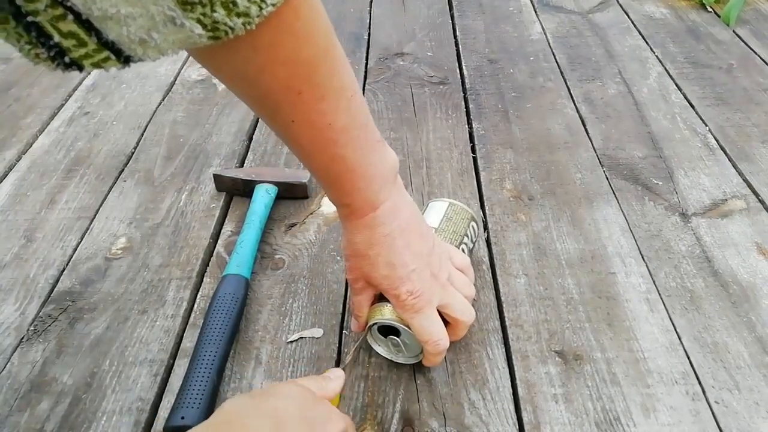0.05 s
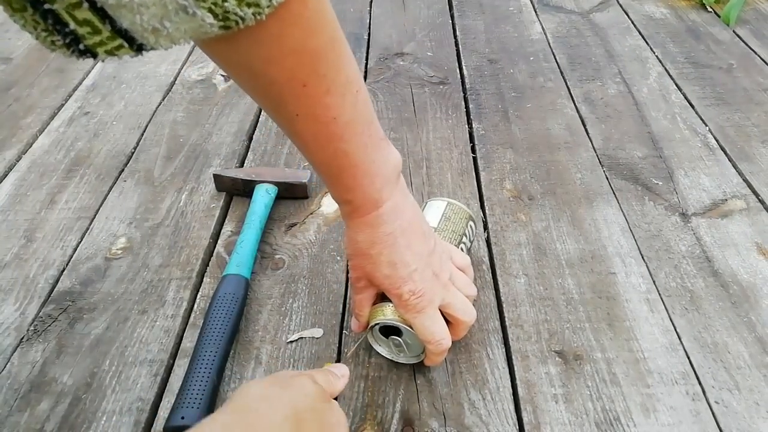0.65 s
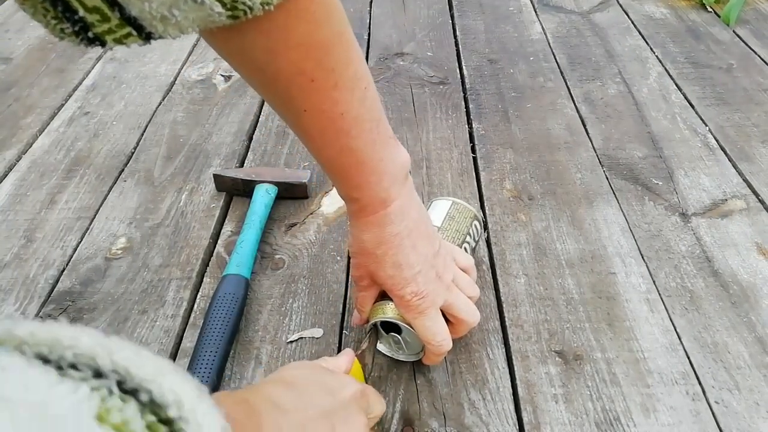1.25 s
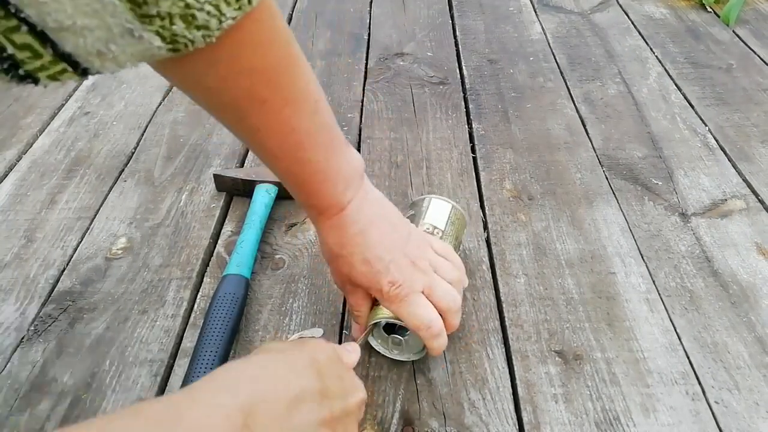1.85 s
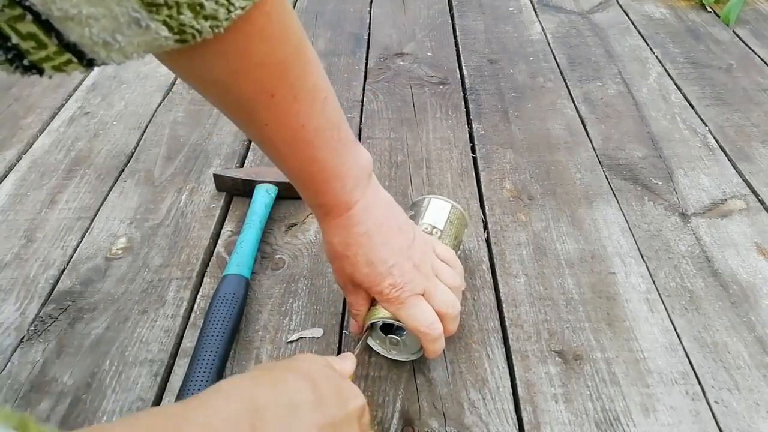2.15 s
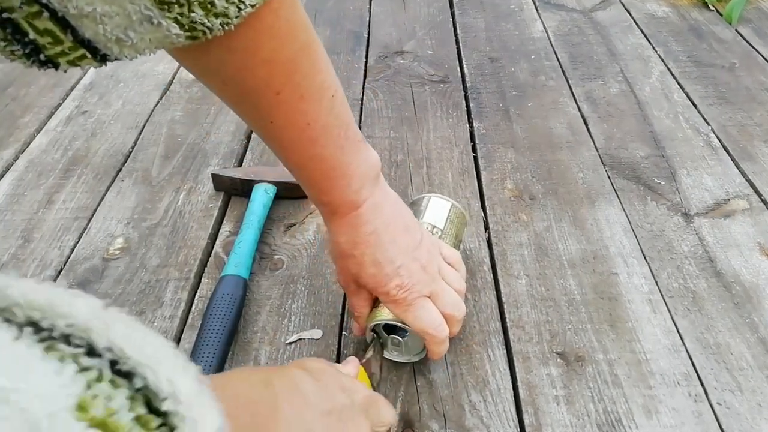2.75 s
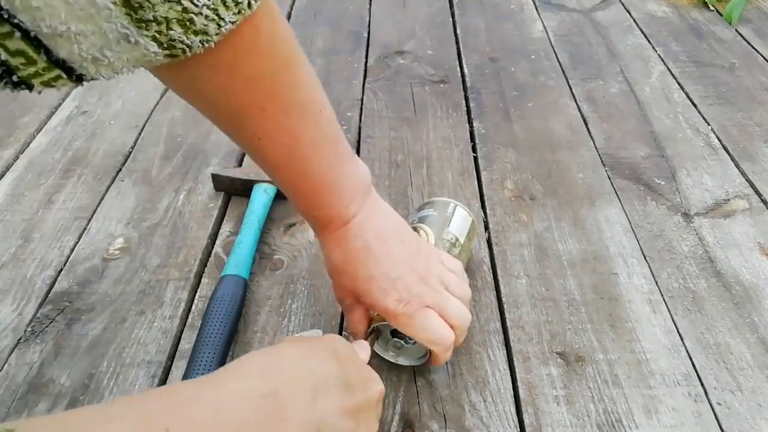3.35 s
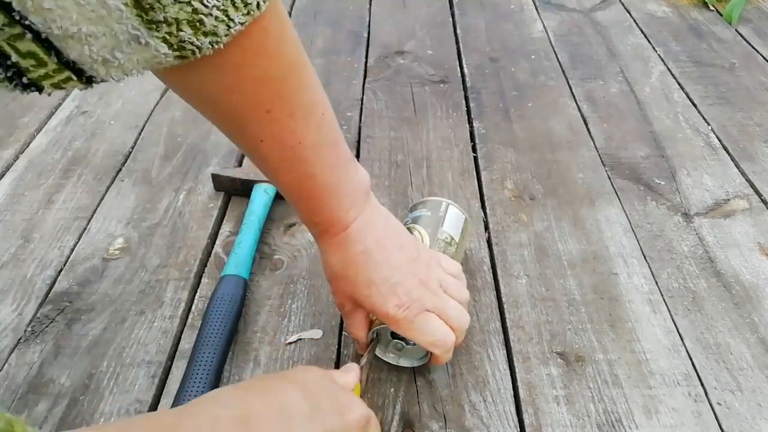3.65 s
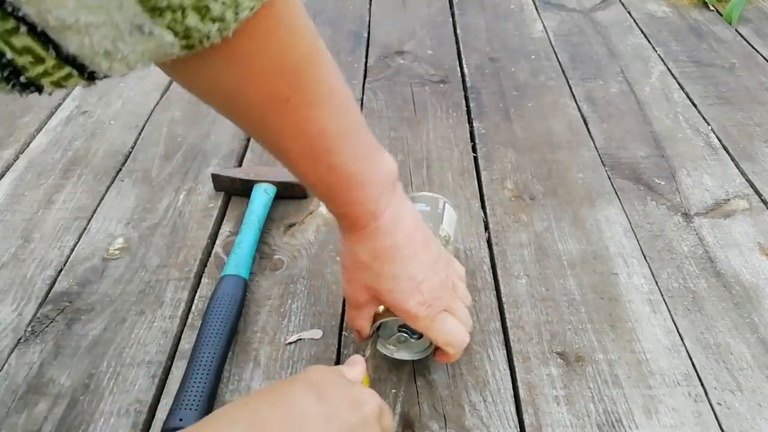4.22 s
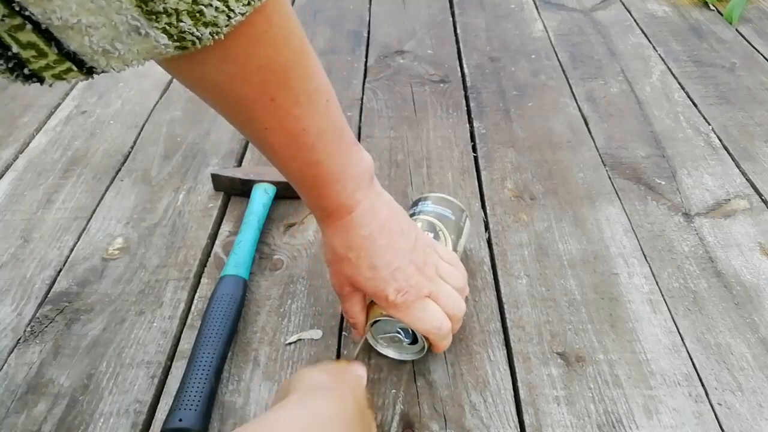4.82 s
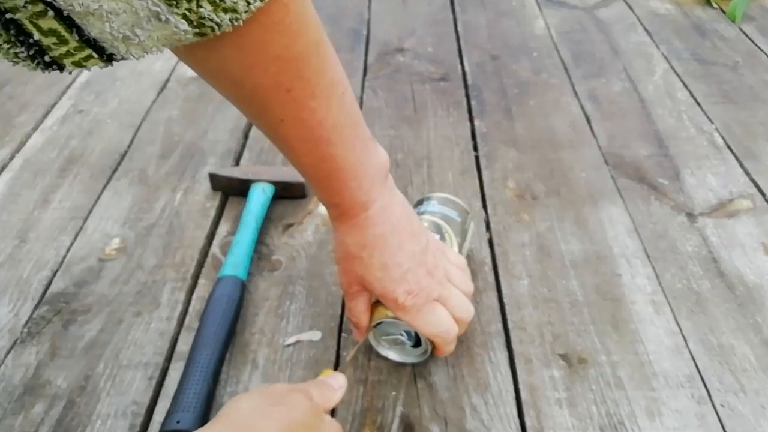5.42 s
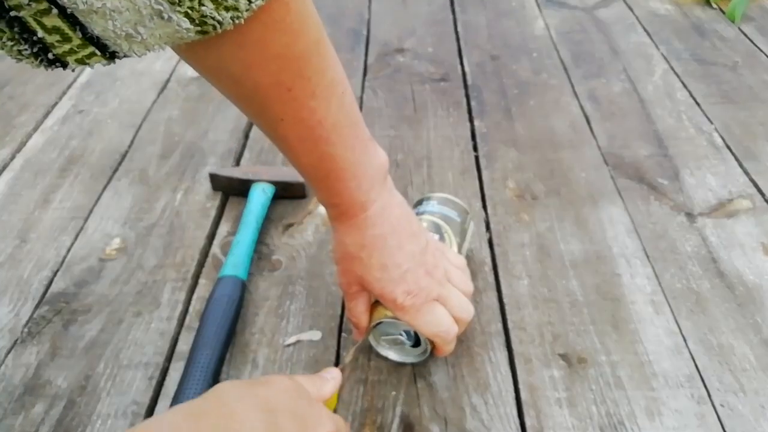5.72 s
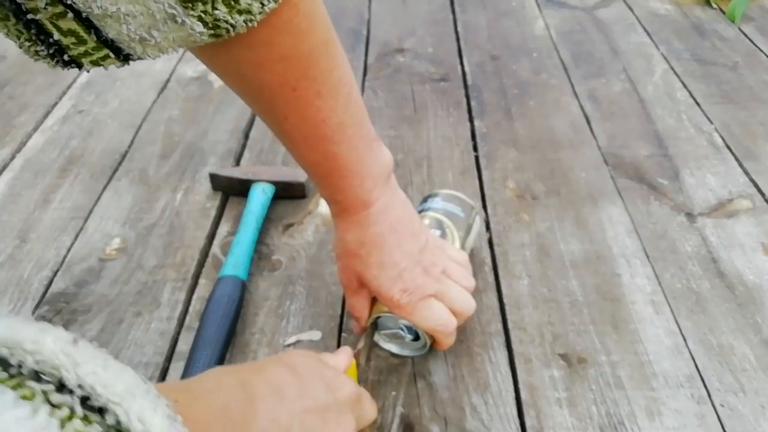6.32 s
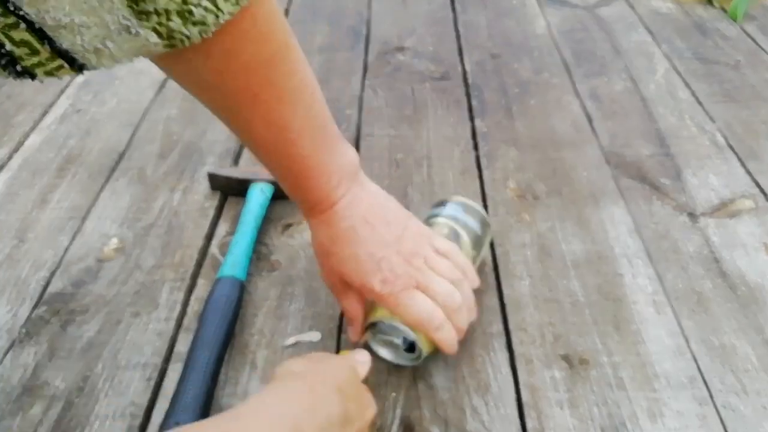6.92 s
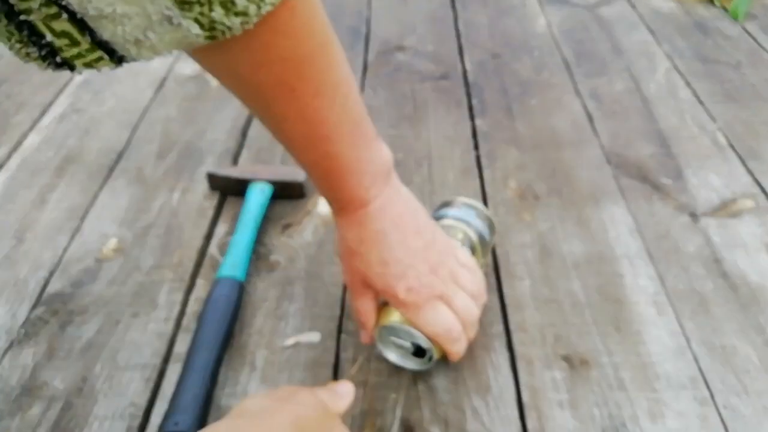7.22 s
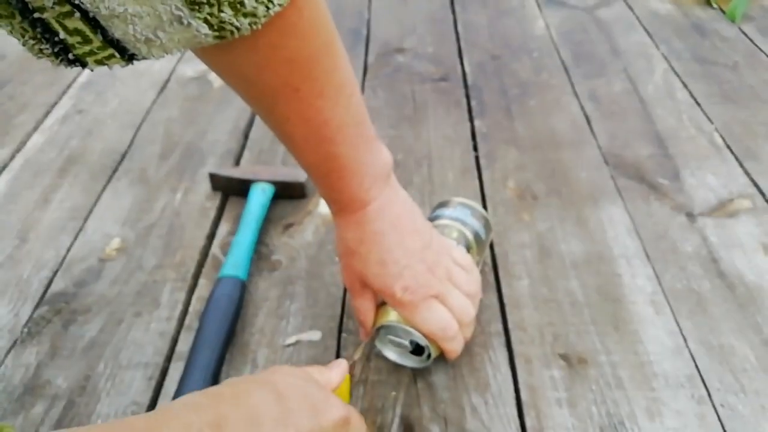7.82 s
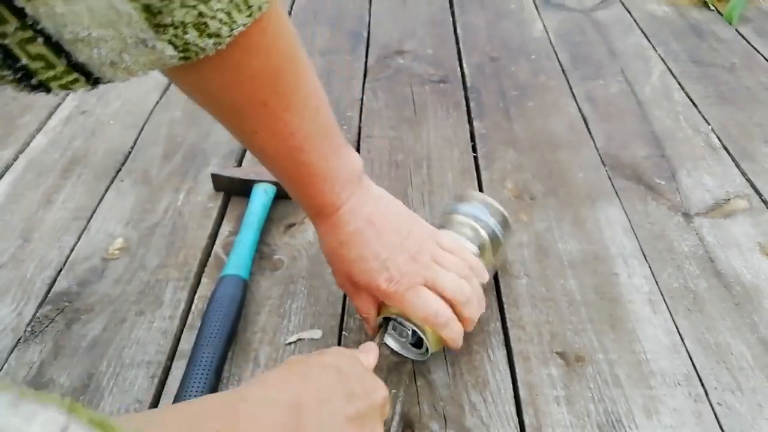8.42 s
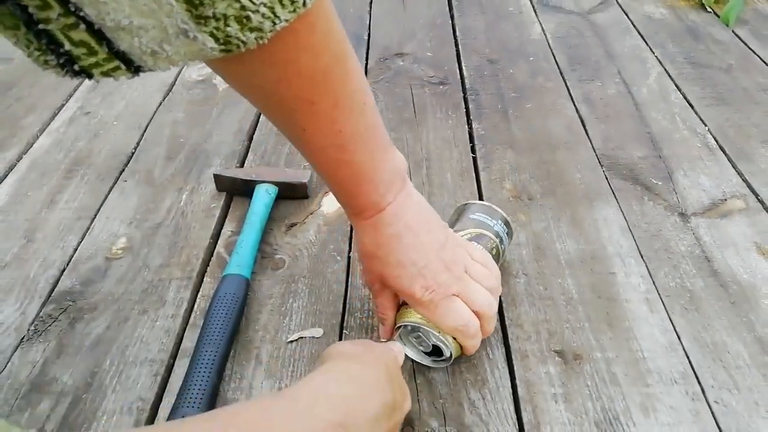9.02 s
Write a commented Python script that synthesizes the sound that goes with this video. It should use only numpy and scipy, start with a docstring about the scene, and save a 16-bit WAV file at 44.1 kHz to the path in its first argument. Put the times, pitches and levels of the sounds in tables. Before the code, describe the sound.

A small knife cuts around the rim of an empty aluminium can, close to the microphone, over very quiet outdoor air. A few light clicks come first, then a short tearing scrape just before 1 second. Sharp snaps and hollow knocks on wood follow from 1.2 to 1.8 seconds. The busiest stretch runs from about 2.3 to 4.3 seconds: crackling, buckling metal, with a loud, briefly ringing snap near 2.9 and dry rubbing as the can turns. Dull microphone thumps accompany snaps near 1.2, 3.6 and 6.1 seconds. From 4.4 to 5.7 seconds there are only softer rubs and ticks, with one very faint, distant falling bird whistle around 5.2. Crisp snaps return at 5.8 seconds and continue in uneven clusters, mixed with crinkles, small knocks and a scrape near 8.4, ending with a sharp click around 9 seconds.

```python
"""Outdoors on garden planks, a small knife works round the rim of an empty aluminium can held by hand.
The can rubs each time it is turned, its thin wall snaps and buckles, and the blade tears through in short
stick-slip bites. Snags and knocks sound the lid and the hollow inside, and the torn edge crinkles.
A few jolts overload the close microphone with a dull thump; a light breeze blows and a bird calls far off."""
import sys
import numpy as np
from scipy import signal
from scipy.fft import rfft, irfft, next_fast_len
from scipy.io import wavfile
from scipy.ndimage import map_coordinates

SR = 44100
rng = np.random.default_rng(int(sys.argv[2]) if len(sys.argv) > 2 else 0)


def wav_out(sig):
    """Save sig, one row per channel (or a flat mono array), as 16-bit PCM at SR to the path in sys.argv[1]."""
    wavfile.write(sys.argv[1], SR, np.round(np.clip(np.atleast_2d(sig).T, -1, 1) * 32767).astype(np.int16))


N = 399546


def amp(db):
    return 10 ** (np.asarray(db) / 20)


def unit_rms(x):
    return x / np.sqrt(np.mean(x ** 2) + 1e-20)


def along(points, hz):
    """Read a curve of (frequency, value) points on a log-frequency axis."""
    freqs, values = np.transpose(points)
    return np.interp(np.log(hz + 1), np.log(freqs), values)


def wobble(rate):
    """A smooth random curve, rate knots a second."""
    knots = rng.standard_normal(int(N * rate / SR) + 4)
    return map_coordinates(knots, [np.arange(N) * rate / SR])


def add(track, start, sound):
    """Mix a sound into the track, start seconds in."""
    part = track[:, round(start * SR):][:, :sound.shape[-1]]
    part += sound[..., :part.shape[-1]]


def colour(points, hz):
    """Minimum-phase EQ through (frequency, gain) points."""
    cepstrum = irfft(np.log(amp(along(points, hz))))
    half = len(cepstrum) // 2
    return np.exp(rfft(np.r_[cepstrum[0], 2 * cepstrum[1:half]], len(cepstrum)))


def resonance(hz, centre, width):
    """The band-pass response of one damped mode."""
    return 1j * hz * width / (centre ** 2 - hz ** 2 + 1j * hz * width)


def push(start, length, db, arch_db=9.5, stop_db_per_s=1201):
    """Envelope of one push of hand or wind: it speeds up and slows in an arch, then stops quickly."""
    from_middle = np.abs(np.arange(N) / SR - start - length / 2)
    arch = arch_db * np.minimum(2 * from_middle / length, 1) ** 2
    ends = stop_db_per_s * np.clip(from_middle - length / 2, 0, 1)
    return amp(db - arch - ends)


# Stereo lean of the two microphone ports: (frequency [Hz], left over right [dB])
PORT_BALANCE = [(350, 0.5), (700, 5), (1290, -2), (2380, 4.5), (8120, -4.5), (15000, 21.5)]
# How alike the ports sound: (frequency [Hz], correlation [0-1])
PORT_LIKENESS = [(200, 1), (5000, 0.42), (15000, 0.14)]
def radiate(force, response, lead_s=4e-5):
    """Two unrelated forces reach the ports through a response, at rms 1; the left port is nearer."""
    n = force.shape[-1]
    size = 2 * next_fast_len(n * 3 // 4)
    hz = np.fft.rfftfreq(size, 1 / SR)
    common, apart = rfft(force, size) * response(hz)
    spread = np.arccos(np.clip(along(PORT_LIKENESS, hz), 0, 1)) / 2
    mid, side = common * np.cos(spread), apart * np.sin(spread)
    lean = amp(along(PORT_BALANCE, hz))
    left = (mid + side) * lean
    right = (mid - side) * np.exp(-2j * np.pi * hz * lead_s)
    pair = np.array([left, right]) / np.hypot(lean, 1)
    return unit_rms(irfft(pair, size)[:, :n])


# Tone of the outdoor bed: (frequency [Hz], gain [dB])
AIR_EQ = [(70, 1), (200, -18), (315, 0.5), (500, -19), (5000, -25.5), (15000, -44.5)]
# Gusts on the microphone: (time [s], length [s], level [dB])
GUSTS = [(0.102, 0.474, -59.5)]
def air(lumpy_db=6.0, breeze_db=-64):
    """Quiet outdoor air; a light breeze buffets the ports in low lumps, harder in a gust."""
    bed_gain = amp(-59 + 1.3 * wobble(6.3))
    bed = radiate(rng.standard_normal((2, N)), lambda hz: colour(AIR_EQ, hz))
    buffet = radiate(rng.standard_normal((2, N)), lambda hz: resonance(hz, 84, 62), lead_s=0.0012)
    flow = amp(breeze_db) + sum(push(*gust) for gust in GUSTS)
    return bed_gain * bed + flow * amp(lumpy_db * wobble(18)) * buffet


# Modes of the gripped can: (frequency [Hz], width [Hz], gain [dB])
SHELL_MODES = [(1262.7, 85, 6), (1710, 130, -8.5), (3110, 270, -9), (3338, 67, -1), (5300, 120, -8)]
def shell(hz, sing=1):
    """The can's strong modes stand above a flat bed that stands for its dense weak ones."""
    return 1 + sing * sum(amp(db) * resonance(hz, centre, width) for centre, width, db in SHELL_MODES)


def slips(rate, spike_db, hiss, size=N):
    """Stick and slip: tiny releases of uneven size, rate a second, over smooth friction."""
    strengths = amp(spike_db * np.minimum(rng.exponential(size=(2, size)), 4))
    slipping = rng.random((2, size)) < rate / SR
    releases = slipping * strengths * rng.choice([-1, 1], (2, size))
    return unit_rms(releases) + hiss * rng.standard_normal((2, size))


# Tones of the dry slide and of the lid's hollow midrange: (frequency [Hz], gain [dB])
SLIDE_EQ = [(120, -28.5), (320, 4.5), (550, -10.5), (1200, -3), (2400, 1.5), (6500, 1.5), (8000, -7),
            (15000, 2)]
LID_EQ = [(300, -19), (650, -9), (1150, 3.5), (1900, 1.5), (3000, -13), (7000, -67.5)]
# Pushes that slide the can under hand and blade: (time [s], length [s], level [dB])
RUBS = [(0, 0.12, -46), (0.734, 0.28, -47.5), (1.472, 0.17, -37), (1.627, 0.23, -38), (1.811, 0.13, -52),
        (2.073, 0.092, -33.5), (2.547, 0.11, -26), (2.656, 0.39, -49.5), (2.867, 0.35, -36.5),
        (3.308, 0.18, -43), (3.603, 0.52, -50), (3.98, 0.089, -43.5), (4.254, 0.12, -48.5),
        (4.332, 0.24, -36), (4.756, 0.084, -29.5), (5.083, 0.12, -53.5), (5.77, 0.46, -50.5),
        (6.137, 0.075, -34), (6.235, 0.1, -48.5), (6.495, 0.13, -54), (6.684, 0.17, -41),
        (6.835, 0.31, -37), (7.12, 0.26, -50.5), (7.682, 0.41, -46.5), (8.041, 0.074, -30.5),
        (8.437, 0.088, -26), (8.526, 0.089, -37), (8.629, 0.094, -33.5), (8.745, 0.31, -44)]
def rubbing(rest_db=-62.5, drag_db=-9, bite=0.16):
    """The can turns against skin, steel and wood: a fine rasp, and an uneven drag that sounds the lid."""
    pressure = amp(rest_db) + sum(push(*rub) for rub in RUBS)  # the hand never lies quite still
    grit = slips(rate=970, spike_db=1.5, hiss=1.5)
    snags = slips(rate=90, spike_db=3, hiss=1)
    rasp = radiate(grit, lambda hz: colour(SLIDE_EQ, hz) * shell(hz, sing=0.7))
    drag = radiate(snags, lambda hz: colour(LID_EQ, hz) * shell(hz))
    judder = amp(1.8 * wobble(70))
    brightness = (pressure / pressure.max()) ** bite  # firmer is brighter
    return pressure * (rasp * judder * brightness + drag * amp(drag_db))


def blow(db, t60, response, pop=0.34, rise_s=0.00031, wake_db=-19):
    """A clean pop, a flurry of flexing waves and a longer, weaker wake; db is its energy over 10 ms."""
    t = np.arange(SR // 5) / SR
    attack = 1 - np.exp(-t / rise_s)  # the crack takes a moment to run
    decay = amp(-60 * t / t60) + amp(wake_db - 60 * t / (3 * t60))
    force = rng.standard_normal((2, len(t))) * attack * decay
    force[0, round(rise_s * SR)] += pop * np.linalg.norm(force[0])
    return amp(db) / np.sqrt(20) * radiate(force, response)


def dented(eq, detune=0.042, sing=1):
    """The response of one part of the can, retuned a little at random by the grip and the dents."""
    shift = np.exp(detune * rng.standard_normal())
    return lambda hz: colour(eq, hz) * shell(hz / shift, sing)


def cavity(time, start_hz=303, rise_hz_per_s=6, width_hz=22):
    """The air in the can rings like a bottle, higher each second as the cut widens the opening."""
    centre = start_hz + rise_hz_per_s * time
    return lambda hz: resonance(hz, centre, width_hz) * resonance(hz, centre, 2 * centre)


# Tones of the wall's crack and the torn edge's sizzle: (frequency [Hz], gain [dB])
WALL_EQ = [(900, -20.5), (2100, 1), (6500, 2), (12000, -29.5)]
EDGE_EQ = [(4000, -26), (8000, -9), (11000, -4), (15000, 0.5)]
# The metal snaps: (time [s], wall level [dB], buckling patch pitch [Hz], lid level [dB], edge level [dB])
SNAPS = [(0.0284, -28, 1663, -23, -70), (0.2265, -27.5, 6600, -48, -28.5),
         (0.2887, -30.5, 3700, -32.5, -25.5), (1.177, -27, 4200, -27.5, -19),
         (1.298, -17, 4860, -21.5, -20), (1.4006, -18, 4450, -26.5, -15), (1.6763, -19, 4830, -29, -12.5),
         (1.7667, -18, 2250, -23, -14.5), (2.179, -34, 1370, -26.5, -50), (2.3612, -26.5, 5370, -25.5, -21),
         (2.381, -27.5, 5400, -53, -19.5), (2.4822, -17.5, 3900, -23, -20),
         (2.7963, -26.5, 4040, -33, -43.5), (2.8954, -12.5, 3000, -18, -16), (3.0937, -20, 2780, -22, -40),
         (3.1509, -18.5, 3740, -22.5, -16), (3.4342, -15.5, 3050, -15.0, -15),
         (3.5451, -26.0, 3020, -26.5, -50.5), (3.565, -17, 6100, -65, -10.5),
         (3.5738, -18, 4730, -24.5, -18), (3.5838, -18.5, 4870, -27, -9), (3.7653, -17, 3040, -27, -28),
         (3.773, -17.5, 3700, -20.5, -12.5), (3.97, -19.5, 3500, -26.5, -30.5),
         (4.1455, -28.0, 4370, -41, -23), (4.1886, -17.5, 2900, -30.5, -32), (4.229, -17, 3870, -24, -13),
         (5.7876, -16.0, 3480, -30, -19), (5.8845, -17.5, 5840, -25, -13), (5.8917, -18.5, 5100, -23, -45),
         (6.115, -27.5, 4330, -29.5, -18.5), (6.133, -22, 5200, -30, -22), (6.2481, -35, 6200, -40, -18.5),
         (6.3253, -27, 5030, -36, -16), (6.6859, -23.5, 4100, -33.5, -27), (6.6985, -13.5, 4100, -26, -16),
         (6.968, -48, 2200, -17.5, -36), (7.0511, -16.0, 4200, -18, -12.5),
         (7.7682, -13.5, 4250, -22.5, -13.5), (7.848, -16, 2310, -29.5, -20),
         (7.9467, -24.5, 4000, -26, -27), (7.9883, -19, 2120, -33.5, -17), (8.3772, -29.5, 1900, -17, -63),
         (8.8441, -26.5, 2440, -29.5, -49), (8.8577, -21, 4120, -27, -16), (8.963, -30.5, 2230, -21.5, -51),
         (9.0513, -15, 4450, -31, -14.5)]
def snaps(cavity_db=-15, crisp_t60=0.022, dull_t60=0.027, patch_width=0.59):
    """Each snap shakes the wall, the lid and the torn edge; the lid pumps the air inside."""
    out = np.zeros((2, N))
    for time, wall_db, patch_hz, lid_db, edge_db in SNAPS:
        sharpness = edge_db - lid_db
        t60 = np.interp(sharpness, [-15, 5], [dull_t60, crisp_t60])  # dull knocks outlast crisp cracks
        wall, lid = dented(WALL_EQ), dented(LID_EQ, detune=0.028, sing=1.3)
        patch = lambda hz: wall(hz) * resonance(hz, patch_hz, patch_width * patch_hz)
        add(out, time, blow(wall_db, t60, patch))
        add(out, time, blow(lid_db, t60, lid))
        add(out, time, blow(edge_db, t60, lambda hz: colour(EDGE_EQ, hz)))
        add(out, time, blow(lid_db + cavity_db, 0.005, cavity(time)))
    return out


# Pure tails after a snap: (time [s], pitch [Hz], level [dB], 60 dB decay [s])
NOTES = [(0.288, 3881, -39.5, 0.19), (3.15, 275.6, -45.5, 2.6)]
def ringing_notes():
    """Now and then a blow leaves one soft note ringing."""
    out, t = np.zeros((2, N)), np.arange(SR) / SR
    for time, hz, db, t60 in NOTES:
        add(out, time, amp(db - 60 * t / t60) * np.sin(2 * np.pi * hz * t))
    return out


# Tone of tearing aluminium: (frequency [Hz], gain [dB])
TEAR_EQ = [(100, -26.5), (1150, -10), (3500, -2.5), (6000, -4.5), (8000, -14.5), (15000, -14.5)]
# Bites of the blade: (time [s], length [s], level [dB])
BITES = [(0.859, 0.0058, -26.5), (0.875, .012, -23), (0.893, 0.074, -19.5), (0.94, 0.0096, -14),
         (0.955, 0.036, -28), (1.717, 0.016, -23), (1.737, 0.017, -21), (2.578, 0.073, -30),
         (4.201, 0.022, -18.5), (4.775, 0.012, -32)]
def cutting(sing=2.8, cavity_db=8, grab_s=0.0017, let_go_s=0.0035):
    """The blade tears the wall in bites, each a run of slips that makes the can and its air sing."""
    out, t = np.zeros((2, N)), np.arange(SR // 5) / SR
    for time, length, db in BITES:
        pressure = (1 - np.exp(-t / grab_s)) * np.exp(-np.maximum(t - length, 0) / let_go_s)
        force = slips(rate=1700, spike_db=0.2, hiss=0.6, size=len(t)) * pressure
        can = dented(TEAR_EQ, detune=0.0074, sing=sing)
        tear = radiate(force, lambda hz: can(hz) * (1 + amp(cavity_db) * cavity(time)(hz)))
        add(out, time, amp(db) * np.sqrt(np.mean(pressure ** 2)) * tear)
    return out


# The blade catches on the lid: (time [s], level [dB])
CATCHES = [(1.083, -32), (1.325, -35.5), (1.631, -34.5), (1.91, -37), (2.258, -34), (2.728, -30.5),
           (3.072, -24), (3.142, -25.5), (3.414, -29), (4.381, -33.5), (4.459, -31), (5.087, -39.5),
           (5.563, -30.5), (5.859, -32), (6.092, -30), (6.19, -29.5), (6.311, -31), (6.448, -48),
           (6.659, -41.5), (7.04, -31), (7.376, -26.5), (7.49, -39.5), (7.643, -40), (7.692, -42),
           (8.888, -35.5)]
def catches(t60=0.036, rasp_db=-4, cavity_db=-13):
    """The blade snags and drags on the lid: a soft, hollow tick with a little rasp."""
    out = np.zeros((2, N))
    for time, db in CATCHES:
        add(out, time, blow(db, t60, dented(LID_EQ)))
        add(out, time, blow(db + rasp_db, t60, dented(TEAR_EQ)))
        add(out, time, blow(db + cavity_db, t60, cavity(time)))
    return out


# Jolts that overload the microphone: (time [s], gain [dB])
JOLTS = [(1.1777, -2.5), (1.403, -22), (3.5828, -6), (3.775, -11), (6.117, -7.5), (6.325, -17.5)]
def thumps(fall_s=0.0023, rise_s=0.00057, recovery_s=0.023, right_lag_s=0.00058):
    """A jolt pushes the microphone one way and it creeps back: a dull thump, later in the right port."""
    out = np.zeros((2, N))
    t = np.maximum(np.arange(SR // 2) / SR - [[0], [right_lag_s]], 0)
    shove = np.exp(-t / fall_s) - np.exp(-t / rise_s)
    creep = (fall_s - rise_s) / recovery_s * np.exp(-t / recovery_s)
    for time, db in JOLTS:
        add(out, time, -amp(db) * (shove - creep))
    return out


# The can lands on the plank: (time [s], level [dB])
KNOCKS = [(1.297, -25.5), (1.379, -27), (2.895, -33), (3.038, -26.5), (3.436, -36), (4.34, -44.5),
          (4.589, -35), (6.666, -39.5), (6.966, -28.5), (8.39, -37), (8.963, -31.5)]
def knocks(plank_hz=760, plank_db=-4):
    """The can bumps the plank: the air inside booms under a dead, hollow tock."""
    out = np.zeros((2, N))
    plank = lambda hz: resonance(hz, plank_hz, plank_hz) ** 3
    for time, db in KNOCKS:
        add(out, time, blow(db, 0.01, cavity(time)))
        add(out, time, blow(db + plank_db, 0.024, plank))
    return out


# Modes of the loosely held metal: (frequency [Hz], gain [dB])
LOOSE_MODES = [(530, -11.5), (855, -4), (1405, -3.5), (1660, -1.5), (2030, 3)]
# Snaps that ring on: (time [s], level [dB])
SHIVERS = [(1.404, -25), (2.896, -17)]
def shivers(t60=0.15, width_hz=42, bed_db=-13):
    """When the grip loosens, the buckled metal shivers on after a snap: a few modes over a dense bed."""
    out = np.zeros((2, N))
    modes = lambda hz: sum(amp(db) * resonance(hz, centre, width_hz) for centre, db in LOOSE_MODES)
    metal = lambda hz: modes(hz) + amp(bed_db) * resonance(hz, 2500, 2000) ** 2
    for time, db in SHIVERS:
        add(out, time, blow(db, t60, metal))
    return out


# The torn edge crinkles: (time [s], level [dB])
CRINKLES = [(1.877, -40), (3.174, -29.5), (3.666, -39.5), (5.086, -37), (7.386, -27.5), (7.517, -39.5),
            (8.026, -33), (8.914, -34.5)]
def crinkles(t60=0.03, wall_db=-8):
    """Small bright ticks of the torn edge, which the wall echoes faintly."""
    out = np.zeros((2, N))
    for time, db in CRINKLES:
        add(out, time, blow(db, t60, lambda hz: colour(EDGE_EQ, hz)))
        add(out, time, blow(db + wall_db, t60, dented(WALL_EQ)))
    return out


# A far-off call: (time [s], length [s], start pitch [Hz], end pitch [Hz], level [dB])
CHIRPS = [(5.197, 0.22, 4550, 3250, -61)]
def bird(waver=0.0298):
    """A faint falling whistle, blurred by distance."""
    out = np.zeros((2, N))
    for time, length, start_hz, end_hz, db in CHIRPS:
        n = round(length * SR)
        hz = np.linspace(start_hz, end_hz, n) * (1 + waver * wobble(384)[:n])
        add(out, time, amp(db) * np.hanning(n) * np.sin(2 * np.pi * np.cumsum(hz) / SR))
    return out


def garden_echo(sound, t60=0.32, wet_db=-28, cutoff_hz=4000):
    """A faint, dull answer from the planks and the garden."""
    t = np.arange(SR // 2) / SR
    scatter = signal.lfilter(*signal.butter(1, cutoff_hz, fs=SR), rng.standard_normal((2, len(t))))
    tail = scatter * amp(-60 * t / t60)
    return amp(wet_db) * signal.fftconvolve(sound, tail / np.linalg.norm(tail[0]), axes=1)[:, :N]


def scene():
    """The can and its echo up front, with the jolted microphone and the garden behind."""
    can = snaps() + knocks() + catches() + shivers() + cutting() + rubbing() + crinkles()
    return can + garden_echo(can) + ringing_notes() + thumps() + air() + bird()


def record(dry, top_hz=15900):
    """The sharpest peaks clip, then a steep low-pass shaves off the very top."""
    size = next_fast_len(N + SR)
    hz = np.fft.rfftfreq(size, 1 / SR)
    clipped = np.clip(dry, -1, 1)
    return irfft(rfft(clipped, size) / np.sqrt(1 + (hz / top_hz) ** 120), size)[:, :N]


dry = scene()
out = record(dry)
wav_out(out)
```